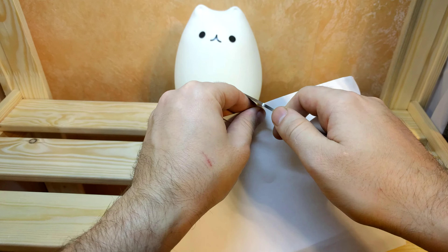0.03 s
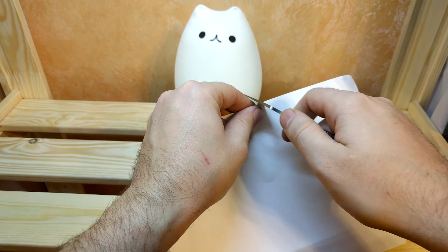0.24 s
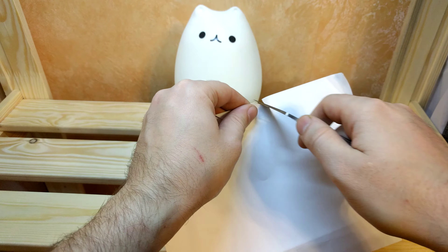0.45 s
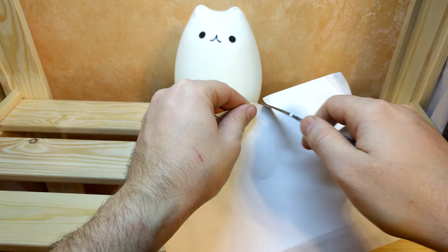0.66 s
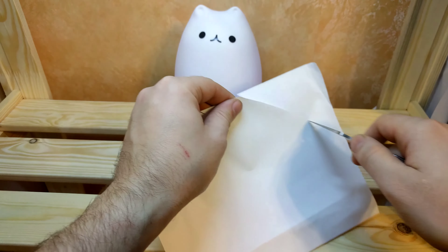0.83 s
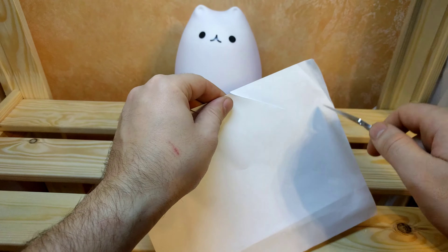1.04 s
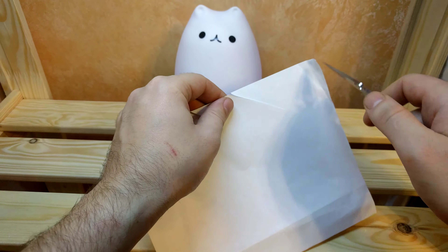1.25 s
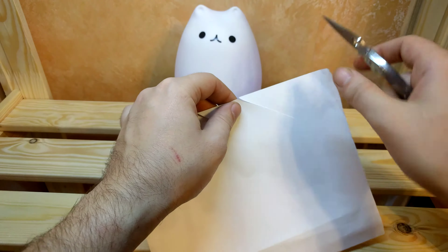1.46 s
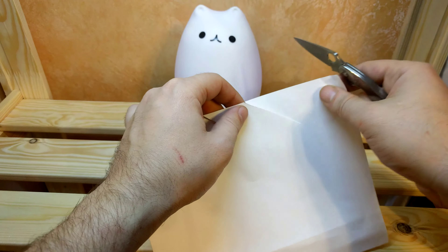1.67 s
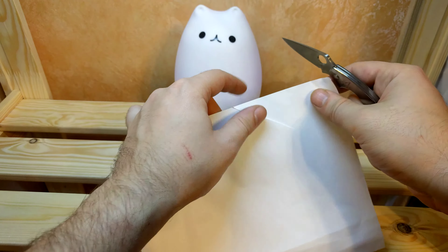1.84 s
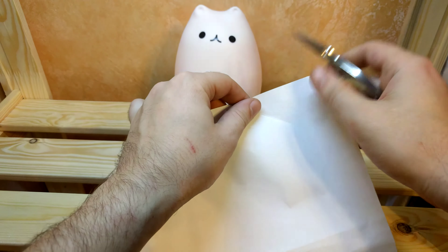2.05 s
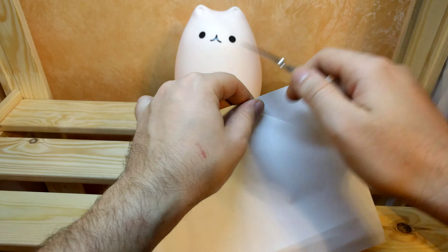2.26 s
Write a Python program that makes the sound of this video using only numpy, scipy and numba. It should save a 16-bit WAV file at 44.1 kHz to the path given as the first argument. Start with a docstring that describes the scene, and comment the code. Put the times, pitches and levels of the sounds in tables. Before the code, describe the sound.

A sharp knife slices through a hand-held paper sheet in one long crisp stroke, then rustling

```python
"""A quiet room's low noise, whose background sinks twice and jumps back: at the start and after the cut.
A sharp blade bites into a hand-held sheet and slices through it in one long stroke: grains of fibre crackle
ring in the sheet, with a falling ring and then a sagging whistle from moving resonances.
Soft knocks ring the sheet's modes as the stroke ends; then fingers slide over the paper as filtered grains,
and it flexes, knocks and snaps in short dying bursts of crackle."""
import sys
import numpy as np
from scipy import signal
from scipy.fft import rfft, irfft
from scipy.io import wavfile
from numba import njit

SR = 44100
rng = np.random.default_rng(int(sys.argv[2]) if len(sys.argv) > 2 else 0)


def amplitude_ratio(level_db):
    """Convert a level in decibels to the matching linear amplitude (field) ratio."""
    exponent = np.asarray(level_db, float) / 20
    return 10 ** exponent


def store_wav(level_fs):
    """Save 16-bit WAV to argv[1]."""
    pcm = np.round(np.clip(np.atleast_2d(level_fs), -1, 1) * 32767)
    wavfile.write(sys.argv[1], SR, pcm.T.astype(np.int16))


N = 101429  # length [samples]

# colour of loose paper shaking: (frequency [Hz], level per Hz [dB])
FLAP_COLOUR = [(88, -26.5), (150, -20.5), (394, -12), (701, -20.5), (1100, -1), (1820, -18), (2220, -5.5),
               (3000, -20.5), (3900, -11.5), (6600, -120)]
# colour of skin rubbing the paper grain: (frequency [Hz], level per Hz [dB])
RUB_COLOUR = [(880, -101.5), (1500, -13), (2520, -10), (4500, -7.5), (6880, 3.5), (9410, -15), (15700, -20)]


def rms_one(x):
    """The sound scaled to an rms of 1."""
    return x / np.sqrt(np.mean(x ** 2) + 1e-20)


def in_time(rows, silent_db=-140):
    """Columns of a table at every sample; the first falls silent outside the table."""
    s, first, *rest = np.transpose(rows)
    t = np.arange(N) / SR
    return [np.interp(t, s, first, silent_db, silent_db)] + [np.interp(t, s, c) for c in rest]


def steep(x, order, hz, kind="low"):
    """Butterworth filter, run forward once."""
    return signal.sosfilt(signal.butter(order, hz, kind, fs=SR, output="sos"), x)


def steep_in_phase(x, order, hz, kind):
    """Butterworth filter run both ways, so that it shifts no phase."""
    return signal.sosfiltfilt(signal.butter(order, hz, kind, fs=SR, output="sos"), x)


def colour(x, spectrum):
    """Causal (minimum-phase) filter with the given spectrum."""
    hz, db = np.transpose(spectrum)
    bins_hz = np.maximum(np.arange(4097) * SR / 8192, 1)
    log_gain = np.interp(np.log(bins_hz), np.log(hz), db) * np.log(10) / 20
    # folding the cepstrum onto positive time gives minimum phase
    cepstrum = irfft(log_gain)
    cepstrum[1:4096] *= 2
    cepstrum[4097:] = 0
    return signal.fftconvolve(x, irfft(np.exp(rfft(cepstrum))))[:N]


def drift(rate):
    """Slow chance at about the given rate [Hz], drawn at every 40th sample and run in; spread 1."""
    r = np.exp(-80 * np.pi * rate / SR)
    noise = rng.standard_normal(N // 40 + 1002)
    slow = signal.lfilter([1], [1, -2 * r, r * r], noise)[1000:]
    return np.interp(np.arange(N) / 40, np.arange(len(slow)), rms_one(slow))


def grains(per_s, spread_db, hiss):
    """Clicks of uneven size over a fine hiss; rms 1."""
    sizes = amplitude_ratio(spread_db * np.minimum(rng.exponential(1, N), 5)) * rng.choice([-1, 1], N)
    clicks = rms_one(sizes * (rng.random(N) < per_s / SR))
    return rms_one(clicks + hiss * rng.standard_normal(N))


def bursts(rows):
    """Envelope of (time [s], level [dB], t60 [s]) bursts: quick rise, exponential fall."""
    rise_s = .002
    age = np.maximum(np.arange(N) / SR - np.array(rows)[:, :1], 0)
    return sum(amplitude_ratio(db - 60 * a / max(t60, .005)) * np.minimum(a / rise_s, 1)
               for a, (_, db, t60) in zip(age, rows))


@njit
def gliding(x, c, r):
    """Two-pole resonance whose pitch (cosine c) and pole radius r may move at every sample."""
    y = np.zeros(len(x))
    for i in range(2, len(x)):
        y[i] = (1 - r[i] ** 2) / 2 * (x[i] - x[i - 2]) + 2 * r[i] * c[i] * y[i - 1] - r[i] ** 2 * y[i - 2]
    return y


def papery(x):
    """The sheet rings on briefly in a thicket of fine modes that keeps changing as it bends; rms 1."""
    ring_t60_s, ring_db, shift_s = .05, -4, .12
    age, step = np.arange(int(ring_t60_s * SR)) / SR, int(shift_s * SR)
    out = np.zeros(N + 2 * step + len(age))
    for i in range(-step, N, step):
        # each overlapping stretch gets a fresh decaying-noise tail
        start, end = max(i, 0), min(i + 2 * step, N)
        tail = rng.standard_normal(len(age)) * amplitude_ratio(-60 * age / ring_t60_s)
        part = x[start:end] * np.sin(np.pi * (np.arange(start, end) - i) / (2 * step))
        ring = signal.fftconvolve(part, tail / np.sqrt(np.sum(tail ** 2)))
        out[start:start + len(ring)] += ring
    return rms_one(x + amplitude_ratio(ring_db) * out[:N])


def ringing(x, rings):
    """The papery sound plus its own narrow resonances, each wandering in pitch and strength; rms 1."""
    width_hz, wander, waver_db = 120, .008, 3  # wander: pitch spread as a share
    x = papery(x)
    radius = np.full(N, np.exp(-np.pi * width_hz / SR))
    out = x.copy()
    for hz, db in rings:
        strength = amplitude_ratio(db + waver_db * drift(7.9))
        pitch_hz = hz * (1 + wander * drift(5))
        out += strength * gliding(x, np.cos(2 * np.pi * pitch_hz / SR), radius)
    return rms_one(out)


def fibre_breaks():
    """Paper fibres parting one by one, as dense uneven clicks over hiss; rms 1."""
    return grains(per_s=6200, spread_db=2.8, hiss=0.84)


def glide(rows, q, patchy_db):
    """Fibre breaks twice through a resonance that moves."""
    s, hz, db = np.transpose(rows)
    hz, db = (np.interp(np.arange(N) / SR, s, v) for v in (hz, db))
    c, r = np.cos(2 * np.pi * hz / SR), np.exp(-np.pi * hz / q / SR)
    ring = gliding(gliding(fibre_breaks(), c, r), c, r)
    # a narrower band passes less noise, so it is made up for
    return ring * np.sqrt(SR * q / hz) * amplitude_ratio(db + patchy_db * drift(10))


def room():
    """Steady low-heavy noise; above the bass it sinks steadily, then jumps back, twice."""
    # room tone: (frequency [Hz], level per Hz [dB])
    room_colour = [(30, -21), (48, -5), (79, -10.5), (111, -15), (361, -20), (782, -28), (3420, -35.5),
                   (6220, -27.5), (15700, -44)]
    # sinking background: (start [s], end [s], depth [dB])
    dips = [(0.043, 0.072, -14.5), (1.149, 1.225, -14.5)]
    level_db, flutter_db, dip_above_hz = -66, .8, 80
    tone = rms_one(colour(rng.standard_normal(N), room_colour))
    tone = tone * amplitude_ratio(level_db + flutter_db * drift(11.0))
    t, dip_db = np.arange(N) / SR, np.zeros(N)
    for start, end, db in dips:
        dip_db += db * np.clip((t - start) / (end - start), 0, 1) * (t < end)
    low = steep_in_phase(tone, 2, dip_above_hz, "low")
    high = steep_in_phase(tone, 2, dip_above_hz, "high")
    return low + amplitude_ratio(dip_db) * high


def cutting():
    """Fibre breaks ring blade and held paper, whose resonances change over three stages; rms near 1."""
    # crackle of the cut: (frequency [Hz], level per Hz [dB])
    cut_colour = [(290, -45), (500, -20.5), (816, -37), (1120, -21), (1580, -7.5), (1800, -13.5),
                  (2210, -16.5), (3030, -8.5), (3260, -8), (4480, -3), (6900, 0.5), (9470, -12),
                  (15700, -17.5)]
    # narrow rings as the blade bites, slices and draws out: (frequency [Hz], level of added ring [dB])
    bite_rings = [(1450, 11), (2280, 16.5), (4050, -11), (5250, 4), (5700, -0.5), (6650, 7.5), (6980, 10),
                  (8030, 6.5), (9050, 6), (9930, 3), (12120, 4)]
    slice_rings = [(1200, 3.2), (2520, 7.2), (6420, 1.6), (6850, 1.5), (7450, 7.8), (8350, 2), (8850, 7)]
    draw_rings = [(1120, 5.1), (2300, 11), (4070, 1.6), (6070, 5.1), (7170, 10.8)]
    slice_s, draw_s, change_s = 0.52, 0.904, 0.23  # middles of the two crossfades, and their length
    t = np.arange(N) / SR
    breaks = colour(fibre_breaks(), cut_colour)
    slicing = np.clip((t - slice_s) / change_s + .5, 0, 1)
    drawing = np.clip((t - draw_s) / change_s + .5, 0, 1)
    cut = (1 - slicing) * ringing(breaks, bite_rings)
    cut += (slicing - drawing) * ringing(breaks, slice_rings)
    return cut + drawing * ringing(breaks, draw_rings)


def stroke():
    """The blade's force drives the cut, the shaking of the loose flap and the gliding rings."""
    # blade in the paper: (time [s], force as level [dB], shaking of the flap against it [dB])
    blade_force = [(.076, -97, -27), (.079, -55.5, -30), (.095, -68, -10), (.105, -53.5, -13.5),
                   (.115, -64.5, -7), (.13, -49, -6.5), (.148, -62, -6), (.160, -74, -6), (.164, -45, -7.5),
                   (.19, -46, -18), (.21, -51, -11), (.24, -40, -18.5), (.28, -38.5, -17), (.3, -41.5, -15),
                   (.42, -36.5, -16), (.468, -34, -24.5), (.506, -37, -16.5), (.6, -35, -17),
                   (.625, -35.5, -13), (.80, -31.5, -23), (.85, -35, -17.5), (.9, -41, -6),
                   (.98, -48, -4.5), (1.01, -44.5, -8), (1.082, -47.5, -21), (1.097, -63.5, -4),
                   (1.13, -81, -15)]
    # sharpness of the fibre breaks: (time [s], gain of the treble [dB])
    break_sharpness = [(0, 11.5), (.44, -4.5), (.54, 3), (.70, 5.5), (.76, -3), (.95, 0), (1.2, 5)]
    flutter_db, sharp_from_hz = 1.6, 9000
    force_db, flap_db = in_time(blade_force)
    sharp_db, = in_time(break_sharpness)
    force = amplitude_ratio(force_db + flutter_db * drift(46))
    cut = cutting()
    treble = steep_in_phase(cut, 3, sharp_from_hz, "high")
    cut = cut + (amplitude_ratio(sharp_db) - 1) * treble
    flap = amplitude_ratio(flap_db) * rms_one(colour(grains(2000, 3.3, 1.0), FLAP_COLOUR))
    return force * (cut + flap + falling_ring() + whistle())


def falling_ring():
    """A broad ring that falls as the free paper ahead of the blade changes."""
    # (time [s], frequency [Hz], level against the force [dB])
    ring_path = [(.56, 9000, -19), (.63, 7750, -3), (.70, 6700, -1), (.76, 4800, -15), (0.801, 3380, -17),
                 (0.838, 2360, -10.5), (.89, 2200, -56)]
    return glide(ring_path, q=2.4, patchy_db=1.5)


def whistle():
    """A narrow whistle that rises briefly, then sags while the blade draws out."""
    # (time [s], frequency [Hz], level against the force [dB])
    whistle_path = [(.84, 8540, -32), (.87, 9060, -22), (.96, 8550, -19), (1.0, 8060, -15), (1.1, 8040, -6)]
    return glide(whistle_path, q=28, patchy_db=1.6)


def taps():
    """A soft knock or buckle rings the sheet's modes, each with its own strength; a dull rattle follows."""
    # sheet knocked or buckling: (time [s], knock level [dB], rattle level [dB])
    tap_rows = [(0.86, -46.5, -60), (0.989, -45.5, -71), (1.563, -62, -66), (1.737, -59, -51),
                (1.803, -52.5, -52), (1.841, -47, -43), (2.0003, -34, -32.5), (2.046, -50, -49),
                (2.16, -45.5, -56)]
    # modes of the sheet: (frequency [Hz], level against the knock [dB], t60 [s])
    sheet_modes = [(397, -4, 0.087), (648, -10.5, 0.059), (1010, 3, 0.03), (1420, -2, 0.045),
                   (2174, -2.5, 0.019), (3380, 1.5, 0.034)]
    rattle_t60_s, soft_hz, thin_hz = 0.071, 1910, 155
    s, db, rattle_db = np.transpose(tap_rows)
    chance_db = rng.normal(0, 1.6, (len(tap_rows), len(sheet_modes)))
    knocks = np.zeros(N)
    for k, (hz, mode_db, t60) in enumerate(sheet_modes):
        clicks = np.full(N, 1e-18)
        clicks[(s * SR).astype(int)] = -amplitude_ratio(db + mode_db + chance_db[:, k])
        r, w = amplitude_ratio(-60 / (t60 * SR)), 2 * np.pi * hz / SR
        knocks += signal.lfilter([0, np.sin(w)], [1, -2 * r * np.cos(w), r * r], clicks)
    knocks = steep(knocks, 2, soft_hz)
    push = grains(2500, 2.5, .8)
    envelope = bursts([(a, b, rattle_t60_s) for a, b in zip(s, rattle_db)])
    rattle = colour(push * envelope, FLAP_COLOUR) / colour(push, FLAP_COLOUR).std()
    return steep(knocks + rattle, 2, thin_hz, "high")


def handling():
    """Skin rubs the paper grain while the sheet flexes."""
    # fingers sliding: (time [s], level [dB], flexing of the sheet against it [dB])
    finger_moves = [(1.1, -66, -13), (1.16, -108, 13), (1.37, -74, -18), (1.40, -62, -5.5),
                    (1.45, -54.5, -17.5), (1.488, -54.5, -14), (1.51, -68, -7.5), (1.62, -75, -6.5),
                    (1.70, -67, -5), (1.708, -52, -12.5), (1.75, -54, -3), (1.78, -57, -6.5),
                    (1.82, -56.5, -3.5), (1.87, -52.5, -9), (1.905, -53.5, -13), (1.95, -62.5, -3.5),
                    (2.035, -55.5, 4.5), (2.07, -58, 0), (2.15, -55, -24), (2.19, -59, -8),
                    (2.24, -56.5, -4.5), (2.27, -71.5, -9), (2.3, -60, -8)]
    # flexing sheet: (frequency [Hz], level per Hz [dB])
    flex_colour = [(59, -39), (100, -2), (409, -3.5), (636, -9.5), (1430, -8.5), (1720, -15), (3000, -17.5),
                   (3900, -19), (6600, -120)]
    level_db, flex_db = in_time(finger_moves)
    rub = papery(colour(grains(per_s=4900, spread_db=2, hiss=0.79), RUB_COLOUR))
    rub = rub * amplitude_ratio(1.5 * drift(35))
    flex = rms_one(colour(grains(1500, 2.5, 0.87), flex_colour)) * amplitude_ratio(flex_db + 1.5 * drift(23))
    return amplitude_ratio(level_db) * (rub + flex)


def snaps():
    """Each crease snaps as a dying burst of crackle, its very top softened."""
    # (time [s], crackle level [dB], t60 [s])
    snap_rows = [(1.723, -48, 0.02), (1.831, -37, 0.022), (1.844, -32, 0.027), (1.914, -42, 0.042),
                 (1.972, -44, 0.032), (2.0005, -34, 0.086), (2.017, -33, 0.015), (2.024, -34, 0.017),
                 (2.084, -51, 0.11), (2.166, -46.5, 0.09), (2.226, -49, 0.04), (2.234, -55, 0.032)]
    dull_hz = 13000
    crackle = steep(grains(6000, 0.92, 0.69), 2, dull_hz)
    return colour(crackle * bursts(snap_rows), RUB_COLOUR) / colour(crackle, RUB_COLOUR).std()


def scene():
    """Room, blade, knocks, fingers and snaps added in one channel."""
    return (room() + stroke() + taps() + handling() + snaps())[None]


def roll_off(x):
    """The treble ends steeply here."""
    return signal.sosfilt(signal.butter(12, 15840, fs=SR, output="sos"), x)


def record(dry):
    """The top is cut steeply and a small constant offset added."""
    # 70 dB down from 16.5 kHz
    mix = signal.sosfilt(signal.cheby2(14, 70, 16500, fs=SR, output="sos"), dry)
    mix = mix - .0009
    return roll_off(mix)


dry = scene()
out = record(dry)
store_wav(out)
```